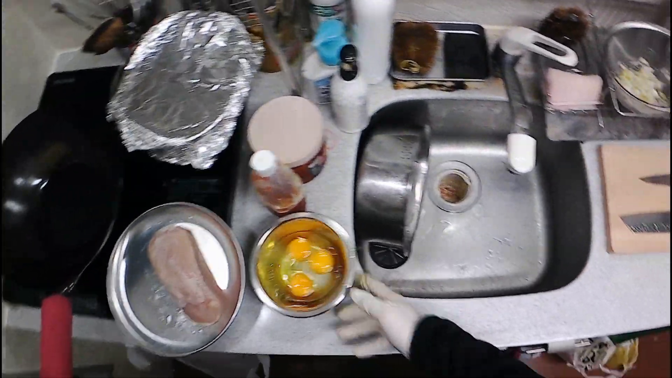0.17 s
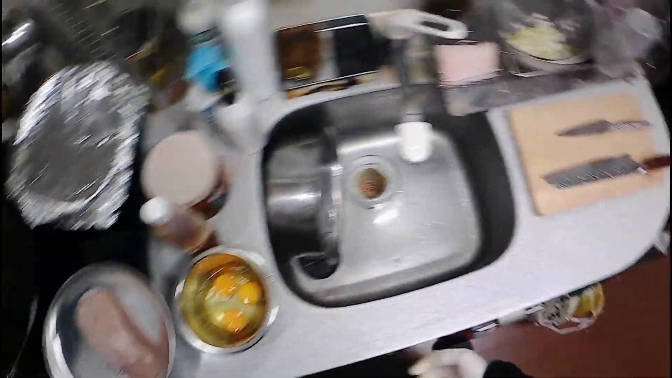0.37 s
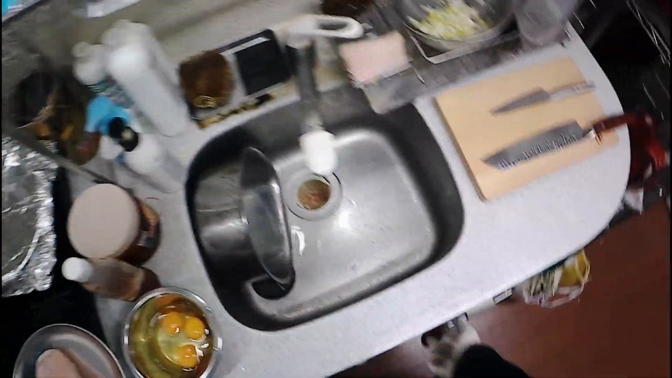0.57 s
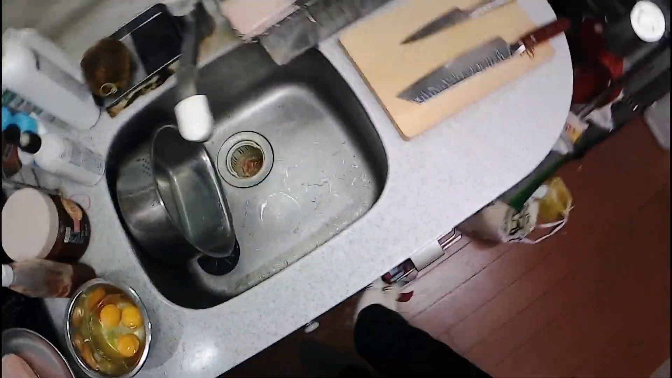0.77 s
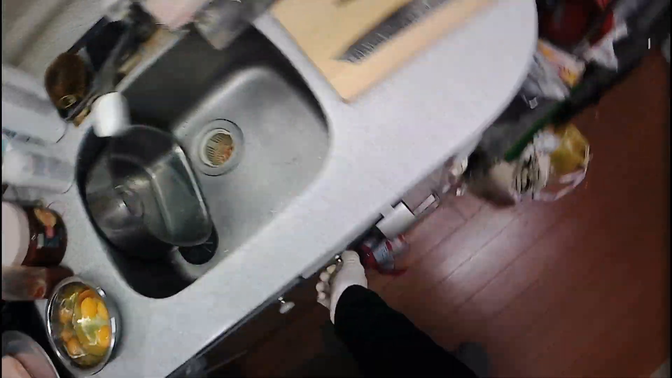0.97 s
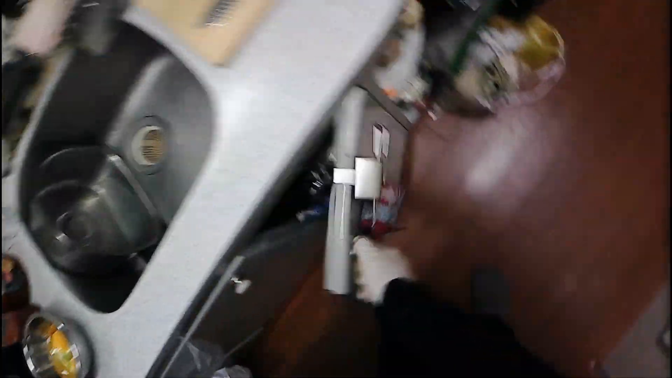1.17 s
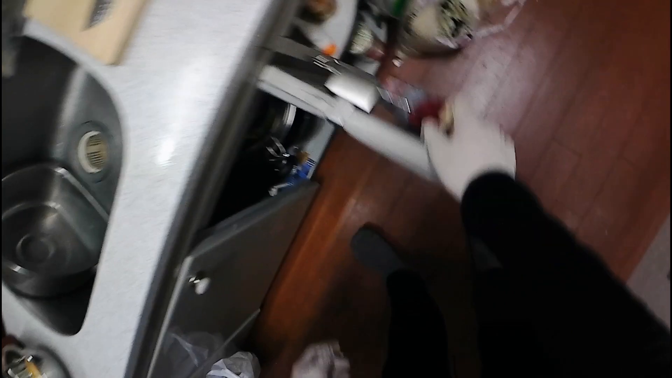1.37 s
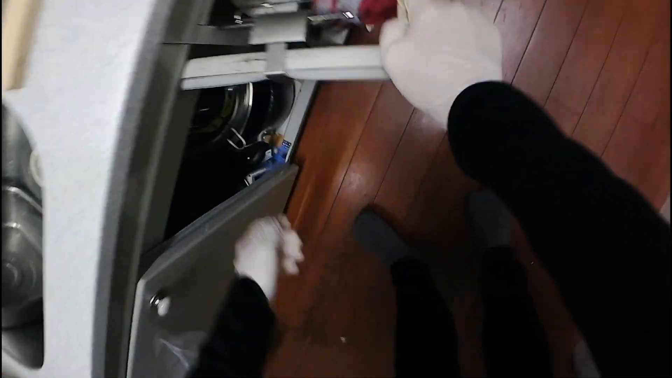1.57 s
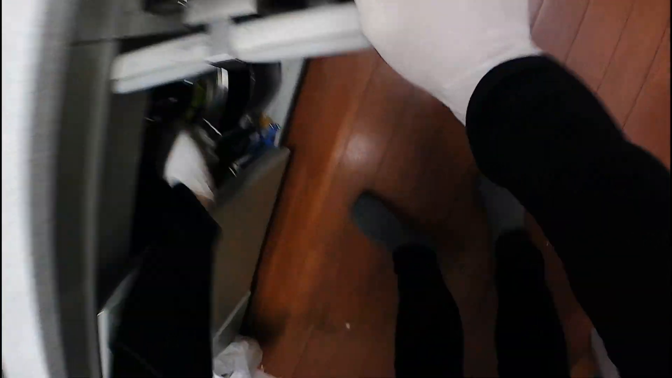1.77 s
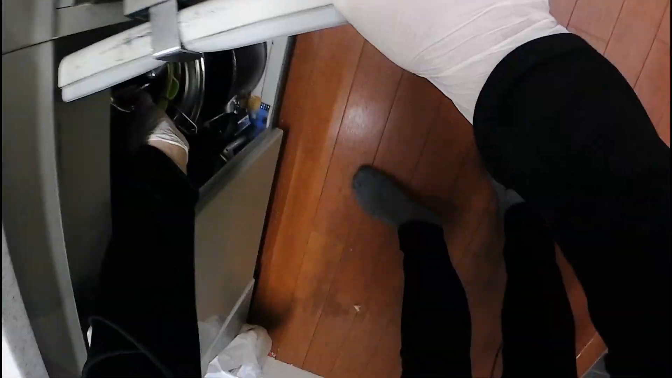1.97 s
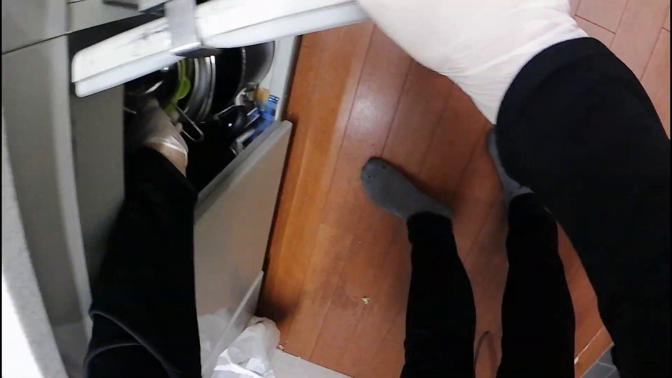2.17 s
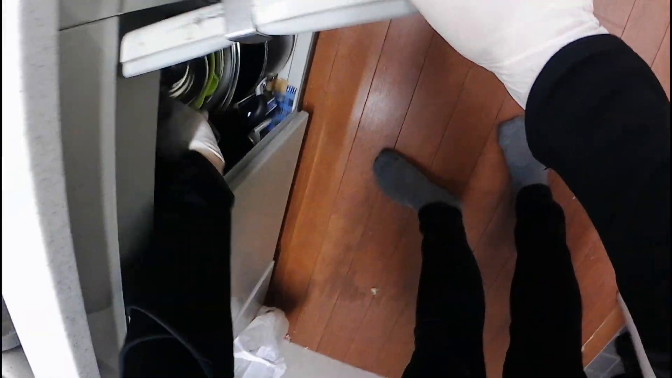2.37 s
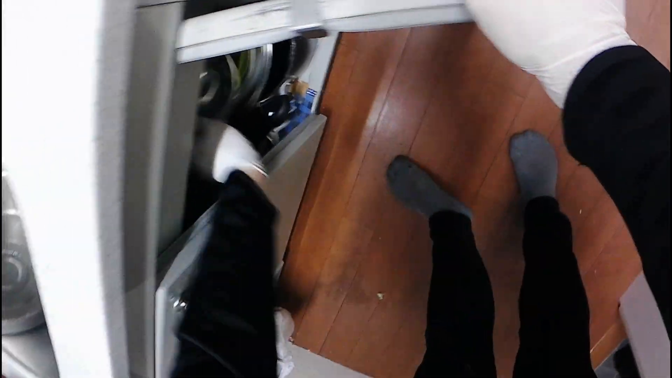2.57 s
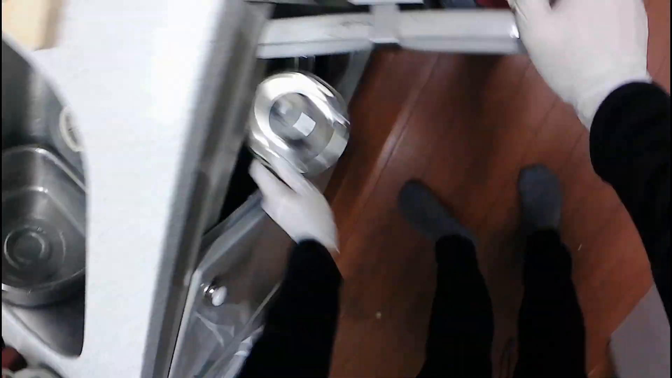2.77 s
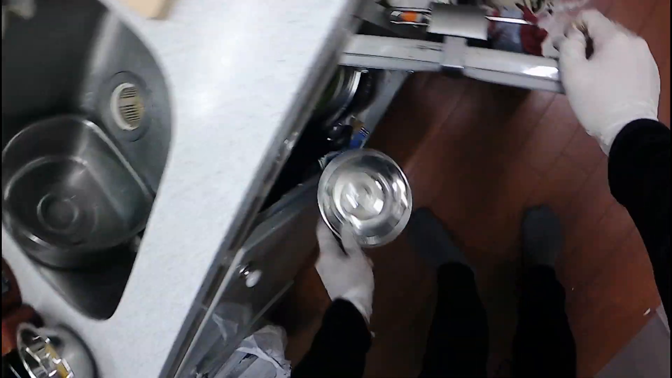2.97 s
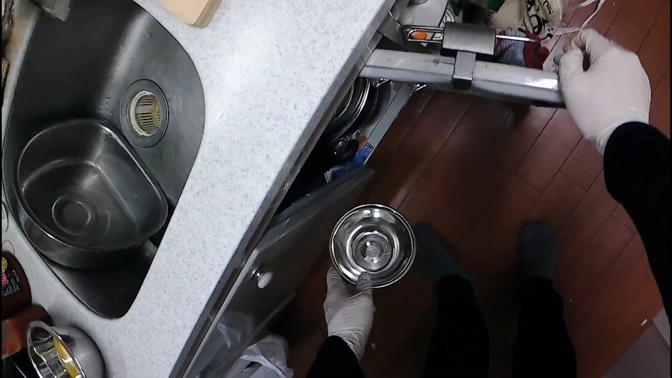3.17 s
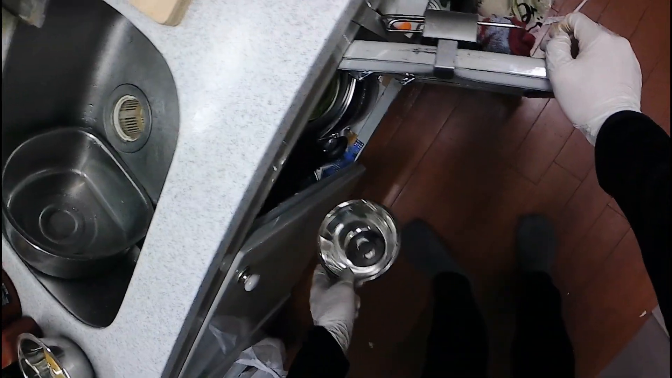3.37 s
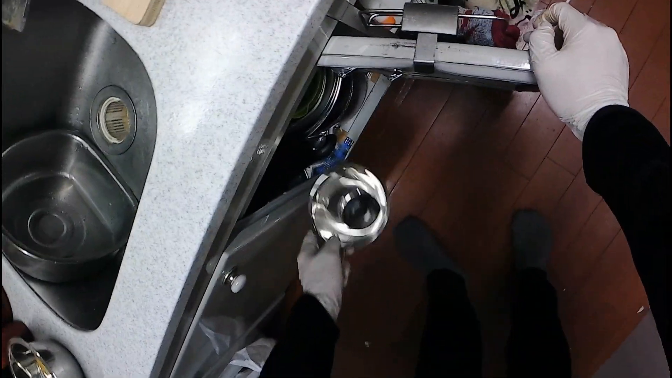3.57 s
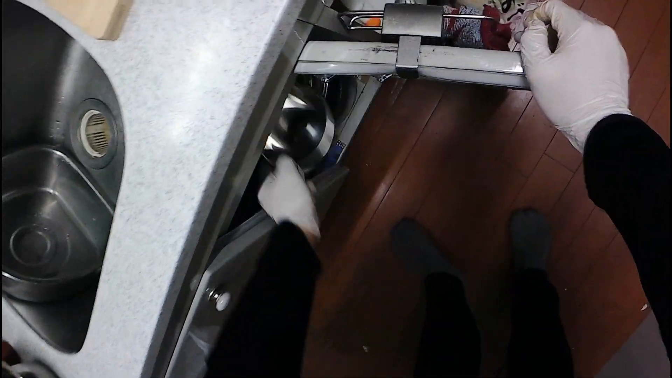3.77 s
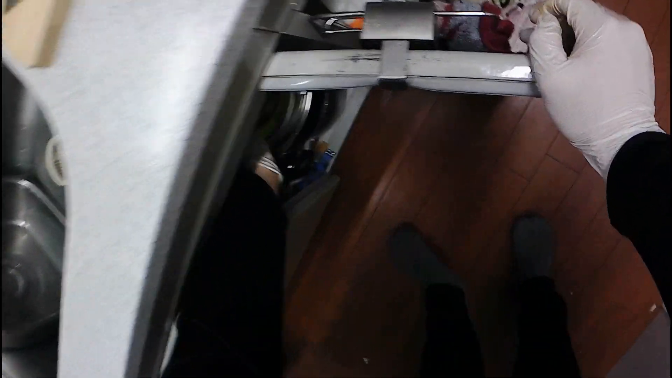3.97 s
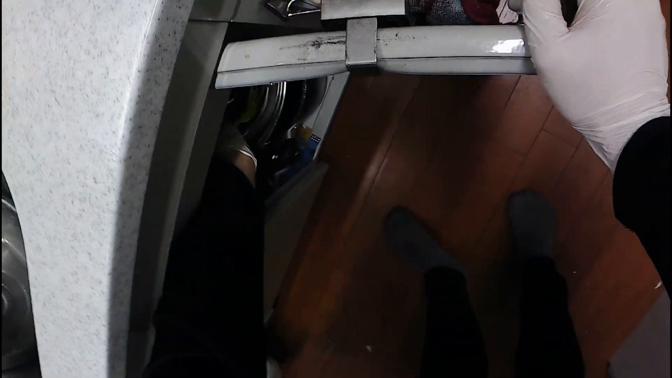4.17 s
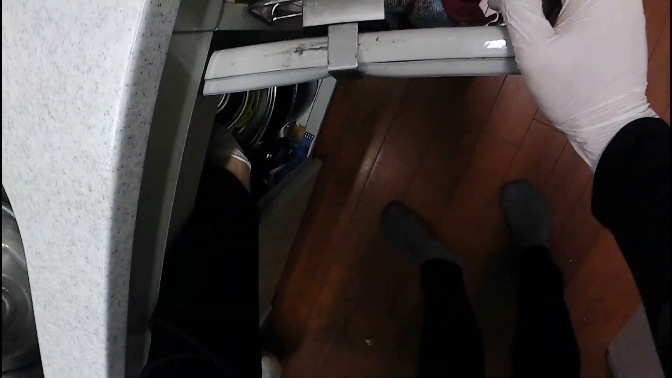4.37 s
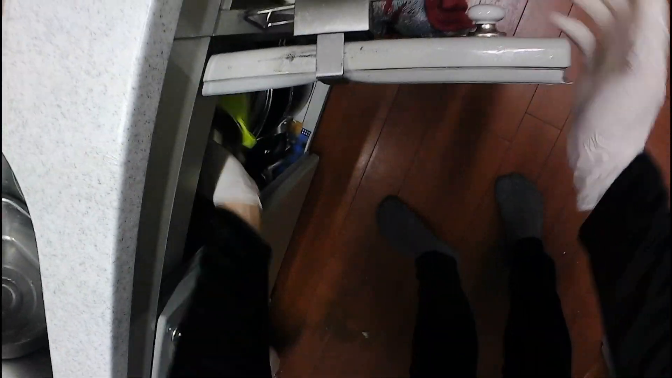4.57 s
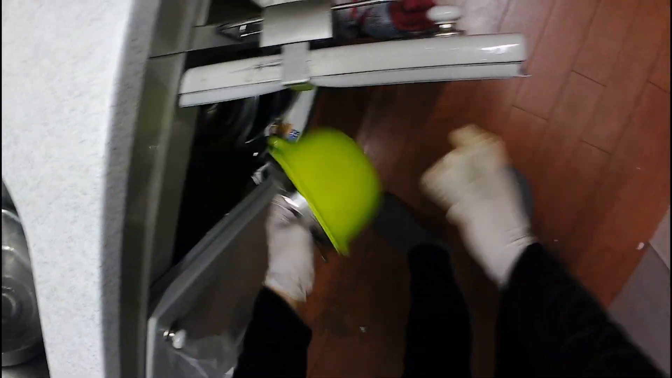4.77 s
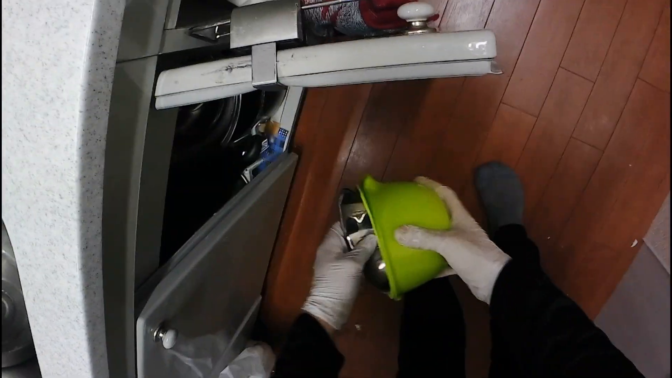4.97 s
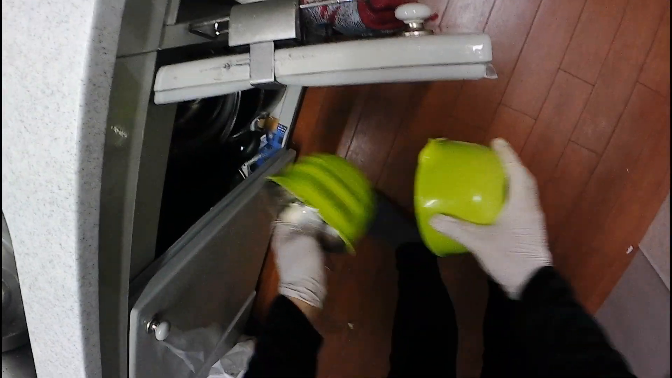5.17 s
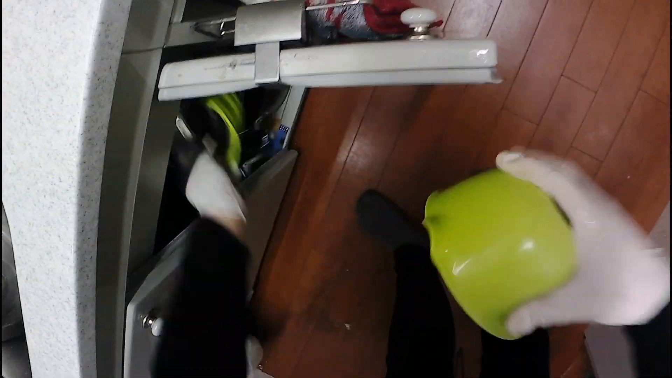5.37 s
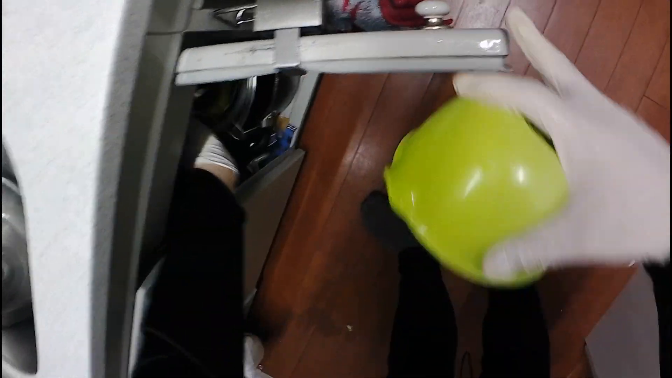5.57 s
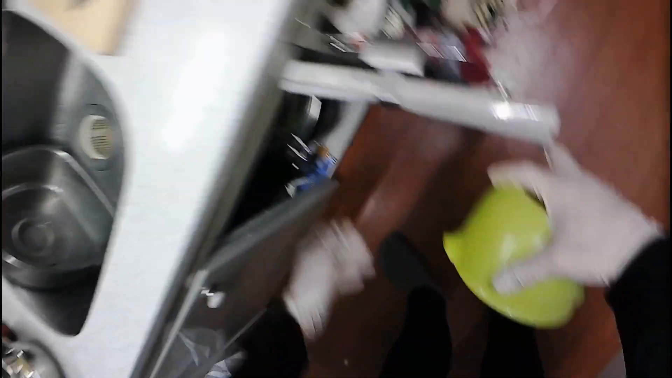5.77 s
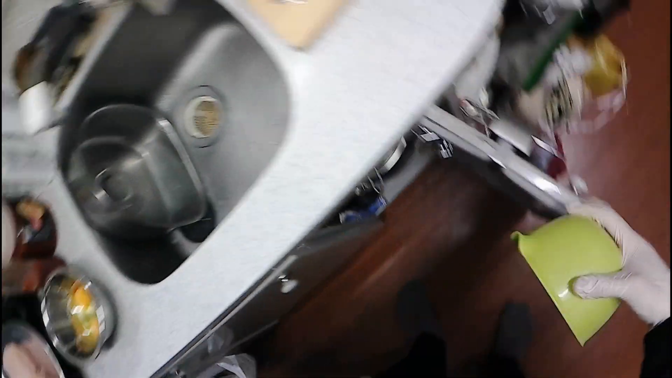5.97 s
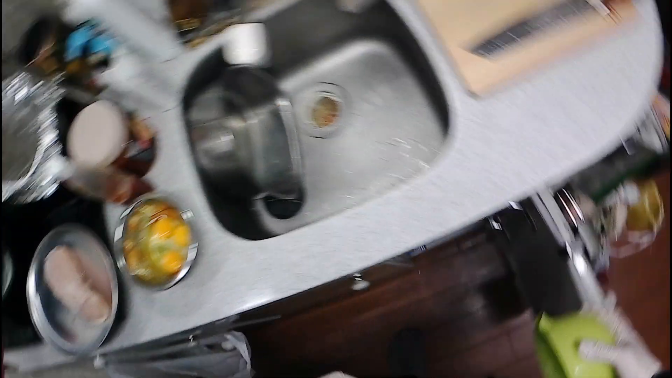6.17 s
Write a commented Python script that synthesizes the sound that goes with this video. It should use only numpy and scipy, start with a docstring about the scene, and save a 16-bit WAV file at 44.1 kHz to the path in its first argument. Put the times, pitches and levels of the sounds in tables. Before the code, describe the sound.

Someone rummages through bowls under a sink: cloth and door rustles, popping microphone bumps, then hollow knocks, a loud clack and scraping drop.

```python
"""In a cupboard under a kitchen sink, nested plastic and steel bowls are knocked, slid and dropped back.
Blows excite damped modes of each bowl; sliding and chattering drive modes with uneven friction noise.
Single rings sound alone, stick-slip makes squeaks, and grainy rubbing comes from door, sleeve and hands.
The microphone is worn on the head: its mount pops as the wearer moves, a faint tick of radio interference
repeats about ten times a second, and body rumble and hiss lie beneath."""
import sys
import numpy as np
from scipy import signal
from scipy.fft import rfft, irfft
from scipy.io import wavfile
from scipy.ndimage import uniform_filter1d

SR = 44100
rng = np.random.default_rng(int(sys.argv[2]) if len(sys.argv) > 2 else 0)


def pcm_store(signal):
    """Save signal as 16-bit PCM."""
    levels = np.round(np.clip(np.atleast_2d(signal), -1, 1) * 32767)
    wavfile.write(sys.argv[1], SR, levels.astype(np.int16).T)


N = 274302  # length in samples

# All t60 values are times to decay by 60 dB. Spectra are relative: the filtered sound is scaled to rms 1.

# Blows on the bowls. Each row: start in seconds, lowest ring in dB, lowest ring in Hz, wall in dB, rim in dB,
# clack in dB, steel in dB, damping as a factor on t60, hardness as rim brightness in dB per octave.
KNOCK_ROWS = [(2.038, -39, 592, -35, -47.5, -65, -54.5, 0.56, -6),
              (2.142, -33.5, 565, -38, -49, -53.5, -64, 0.99, 0),
              (2.369, -34, 575, -30, -44.5, -45, -77, 0.53, 1),
              (3.9232, -18, 640, -20, -31.5, -35, -61, 0.92, -9),
              (4.153, -39, 620, -26, -32.5, -44.5, -50, 0.57, -7),
              (4.312, -44, 705, -48, -52, -74, -78, 0.84, 0),
              (4.327, -41.5, 508.5, -60, -45, -63, -79, 0.99, -29),
              (4.506, -38, 480, -64, -37, -56, -39.5, 0.28, 9.5),
              (4.563, -48, 650, -59, -61, -64, -58, 0.51, 8),
              (4.764, -46, 487, -76, -75, -82, -82, 0.62, 3),
              (4.8545, -12, 572, -22, -29, -37.5, -34.5, 0.62, 6),
              (4.94, -33, 573, -62, -48, -55, -67, 0.71, -10),
              (4.974, -36, 586, -55, -46, -67, -70, 0.58, -11), (5.449, -36, 524, -34, -29, -42, -59, 1, 0),
              (5.552, -28.5, 490, -29, -25.5, -25.5, -23.5, 0.99, -2.5),
              (5.681, -38, 514, -58, -46, -45, -55, 0.72, 11),
              (6.0226, -61, 680, -66, -46.5, -61, -66, 0.74, 17)]
# Modes of the bowl walls. Each row: frequency in Hz, relative level in dB, t60 in seconds before damping.
WALL_MODES = [(757, -9.5, 0.087), (889, 0.5, .1), (916, -6, 0.25), (966, -3, 0.11)]
# Modes of the bowl rims. Each row: frequency in Hz, relative level in dB, t60 in seconds before damping.
RIM_MODES = [(1097, -2, 0.063), (1208, -13, 0.24), (1233, -1.5, 0.15), (1545, 0, 0.088), (1643, -2.5, 0.14),
             (1718, -1, 0.21), (1753, 1.5, 0.042), (2000, -10.5, 0.23), (2330, -9, 0.28),
             (2443, -11.5, 0.36), (2595, -9, 0.03), (2640, -11, 0.31)]
# Modes of the steel bowls. Each row: frequency in Hz, relative level in dB, t60 in seconds before damping.
STEEL_MODES = [(4135, 9, 0.13), (4266, 9, 0.23), (4650, 7, 0.25), (4320, 10, 0.094), (4270, -14, .2),
               (4930, 6, 0.28), (5300, -15, .1), (5900, 1, 0.079), (5800, 16, 0.091), (5900, -22, 0.12),
               (6240, -0.5, 0.078), (7300, -27, 0.11), (8300, -25, .08), (10000, -25, .1), (10800, -25, .1)]
# Lowest modes. Each row: multiple of the lowest ring, relative level in dB, t60 in seconds before damping.
LOW_MODES = [(1, 0, .11), (1.05, -12, .3), (1.18, -10, .21), (0.78, -14, .15)]
# Spectrum of the dull thud between the rings. Each row: frequency in Hz, density in dB per Hz.
BODY_SPECTRUM = [(88, -60), (150, -93), (241, -13), (460, -16), (568, -1), (1170, -16), (1700, -21),
                 (2120, -24.5), (3500, -28), (4550, -35.5), (7700, -120)]
# Spectrum of dry contact noise. Each row: frequency in Hz, density in dB per Hz.
GRIT_SPECTRUM = [(1760, -63), (3000, -10), (3810, 1), (4050, 0), (6130, 2.5), (9860, -3), (11000, 0),
                 (12900, -6.5), (16800, -42), (22000, -120)]
# Bowls sliding and rattling in the stack. Each row: start in seconds, rise in seconds, t60 in seconds,
# lowest ring in dB, lowest ring in Hz, wall in dB, rim in dB, grit in dB.
SLIDE_ROWS = [(1.755, 0.024, 0.28, -54.5, 604, -58, -63, -70),
              (1.83, 0.019, 1.3, -61.5, 600, -61.5, -69.5, -76),
              (2.06, 0.031, 0.87, -56.5, 650, -55.5, -63, -69),
              (2.2, 0.055, 2.7, -72, 600, -60, -69.5, -74), (2.4, 0.011, 0.22, -55, 630, -52, -63, -69),
              (2.46, .04, 1.1, -67, 562, -61, -71, -92), (3.96, 0.015, 0.51, -44, 670, -46, -63, -63),
              (4.09, 0.067, 0.14, -39.5, 607, -40, -49, -54.5),
              (4.17, 0.035, 0.51, -50, 560, -47.5, -53, -60), (4.3, 0.033, 1.04, -52, 510, -53.5, -65, -74),
              (4.41, 0.015, 2.1, -58, 566, -81, -63.5, -70),
              (4.51, 0.016, 0.18, -68, 520, -74, -56.5, -68.5),
              (4.54, 0.028, 0.22, -53, 523, -74, -75, -81), (4.843, 0.01, 0.046, -37, 574, -51, -48, -47),
              (4.885, 0.012, 0.19, -36.5, 625, -41.5, -46, -53),
              (4.93, 0.009, 0.58, -49.5, 603, -55, -64, -69),
              (5.445, 0.013, 1.06, -38.5, 533, -34.5, -38, -36),
              (5.47, 0.03, 0.32, -38, 536, -31.5, -37, -37.5),
              (5.53, 0.04, 0.49, -31, 552, -35, -33.5, -50), (5.68, 0.023, .7, -53, 555, -60, -51.5, -69)]
# Noise between the rim modes of a slide. Each row: frequency in Hz, density in dB per Hz.
RIM_SCRAPE = [(900, -8), (1100, 11.0), (3000, 0), (3600, -57)]
# Steel bowls chattering. Each row: start in seconds, t60 in seconds, level in dB.
CHATTER_ROWS = [(2.14, 0.27, -59), (4.149, 0.16, -49.5), (4.211, 0.13, -57), (5.55, .34, -28),
                (5.684, .35, -51)]
# A bowl holding one note as it skids or rings on after a blow. Each row: start in seconds, rise in seconds,
# hold in seconds, t60 in seconds, mean pitch in Hz, mean level in dB.
SINGLE_RING_ROWS = [(2.4, 0.014, .02, 1.1, 1140, -61.5), (2.47, 0.066, 0.045, 0.13, 898, -62),
                    (5.447, .006, .066, .03, 511, -29), (5.505, .012, .02, .2, 785, -35),
                    (5.56, .015, .03, .2, 1470, -41), (5.47, 0.01, 0.07, .22, 901, -32),
                    (3.945, .015, .05, 0.33, 675, -39)]
# Hinge and glove squeaks. Each row: start in seconds, rise in seconds, hold in seconds, starting pitch in Hz,
# sag in Hz per second, fundamental in dB, overtones in dB, rms wobble as a share of the pitch.
SQUEAK_ROWS = [(0.846, .05, .025, 1997, 500, -55, -28, 0.02),
               (1.371, .009, 0.014, 1905, 100, -51.5, -7.5, 0.117),
               (2.24, 0.0075, .012, 2060, 9000, -57.5, -6, .06),
               (4.806, 0.0051, 0.016, 2010, 1500, -55.5, -5, .11)]
# Door, sleeve and hands rubbing. Each row: start in seconds, rise in seconds, t60 in seconds,
# dull rub in dB, crackle in dB.
RUSTLE_ROWS = [(0.554, 0.011, 0.28, -52, -51), (.705, 0.0098, 0.85, -52.5, -53.5),
               (.86, 0.065, 0.33, -58.5, -66), (.93, .012, 0.19, -59, -57), (.96, 0.022, 0.37, -53, -56),
               (1.01, .025, 0.36, -44, -53), (1.121, .012, 0.37, -56, -60.5), (1.21, .011, 0.19, -59, -59),
               (1.249, .035, 0.45, -60, -60), (1.36, 0.012, .8, -54, -76), (1.6, 0.006, 0.57, -55, -56.5),
               (1.725, .008, .11, -57, -74), (1.868, 0.041, 0.26, -61, -77), (3.72, 0.029, 0.067, -62, -63),
               (3.799, 0.022, 0.069, -68, -62), (3.869, 0.048, .11, -67, -58.5),
               (5.361, 0.092, 0.089, -66, -55.5), (5.67, 0.021, 0.34, -38, -41.5),
               (5.79, 0.022, 0.24, -52, -48), (5.929, 0.023, 0.24, -56, -54.5),
               (6.01, 0.015, 0.18, -68, -48.5), (6.072, 0.019, 0.46, -56.5, -60)]
# Spectrum of the dull rub. Each row: frequency in Hz, density in dB per Hz.
RUB_SPECTRUM = [(90, -47), (200, -6), (330, 2.5), (600, -7), (1200, -62)]
# Spectrum of the crackle. Each row: frequency in Hz, density in dB per Hz.
CRACKLE_SPECTRUM = [(400, -9.5), (900, 1.5), (1500, -2.5), (2800, -14.5), (6000, -20.5), (9000, -53)]
# Decay of the kitchen's reverberation. Each row: frequency in Hz, t60 in seconds.
KITCHEN_DECAY = [(200, 0.36), (800, 0.1), (3000, 0.37), (10000, 0.088)]
# Slips of the mount. Each row: time of the peak in seconds, peak in dB before the low-pass, width in ms.
POP_ROWS = [(0.5187, -43, 0.49), (0.567, -42, 0.3), (0.648, -53, 0.97), (0.9094, -34, 0.5),
            (0.9321, -39, 0.82), (0.9866, -31, 0.32), (1.0243, -30.5, 0.58), (1.0402, -36, 0.7),
            (1.0656, -31.5, 0.38), (1.072, -43, 1.8), (1.1323, -34.5, 0.35), (1.2113, -38, 0.74),
            (1.29, -36, 1), (1.3026, -15.5, 0.26), (1.3101, -19, 0.3), (1.3135, -25.5, 0.38),
            (1.3514, -30.5, 1.3), (1.357, -25, 0.81), (1.4281, -28, 0.26), (1.4523, -39.5, 1.05),
            (1.471, -43, 1), (1.599, -37, 0.56), (1.7158, -42, 0.67), (1.7246, -45.5, 0.75),
            (2.7941, -38.5, 0.56), (2.804, -55, 0.7), (3.7515, -42.5, 0.6), (3.829, -48, 0.54),
            (4.7657, -44, 0.64), (5.2096, -42, 0.66), (5.2807, -43.5, 1), (5.2902, -44, 0.49),
            (5.3791, -43.5, 0.64), (5.9496, -29.5, 0.18), (5.9715, -33, 0.1), (6.0916, -23, 0.16),
            (6.0981, -22, 0.28), (6.1014, -32, 0.43)]
# Mean peak of the tick before the low-pass. Each row: time in seconds, peak in dB.
TICK_LEVEL = [(0, -45.5), (2.5, -48), (3.3, -49), (4, -50.5), (6.2, -42)]
# The body jolting the mount. Each row: start in seconds, amplitude in dB before decay and soft start,
# frequency in Hz, t60 in seconds.
JOLT_ROWS = [(1.358, -41, 61, 0.21), (1.734, -53, 85, 0.53), (3.75, -61, 84.4, 0.63),
             (5.687, -46.5, 126.5, 0.35), (6.09, -47, 54.3, 0.18)]
# Body movement carried to the microphone. Each row: time in seconds, level in dB.
RUMBLE_LEVEL = [(0.0, -70.5), (1.0, -64.5), (1.02, -63), (1.18, -69), (1.37, -49.5), (1.56, -69.5),
                (1.75, -64.5), (1.97, -73), (2.79, -68.5), (3.48, -74.5), (3.95, -61.5), (4.42, -69.5),
                (4.45, -62), (5.16, -70), (5.68, -57), (5.89, -67.5), (6.12, -62), (6.22, -67)]
# Spectrum of that rumble. Each row: frequency in Hz, density in dB per Hz.
RUMBLE_SPECTRUM = [(20, -2.5), (38, -38), (58, 0), (90, -3), (130, -5.5), (200, -15), (400, -42)]
# Spectrum of the microphone hiss. Each row: frequency in Hz, density in dB per Hz.
HISS_SPECTRUM = [(71, -32), (120, -3), (156, -2), (297, 0.5), (451, -6.5), (495, -7.5), (765, -7),
                 (1690, -13), (2080, -12), (2290, -16), (8930, -17), (10200, -19.5), (11000, -98),
                 (14300, -97), (22000, -120)]

STROKE_S = .4  # longest contact
LOW_RISE_S, CHATTER_RISE_S, SQUEAK_T60_S = .0016, 0.0066, 0.035
CLICK_DB, CLICK_PER_HARDNESS = -2.5, 1.56  # click against the rim; harder blows click louder
UNEVEN_DB = 3.  # rms jumps of sliding contacts
TICK_START_S, TICK_EVERY_S, TICK_MS = .0320, .102638, .6
HISS_DB, PATCHY_DB = -63, 1.2  # hiss level and its rms random variation
KITCHEN_DB, EDGE_HZ = -11.5, 12850


def gain_of(db):
    """Amplitude ratio corresponding to a level in decibels."""
    return 10 ** (np.asarray(db) / 20)


def evened(x):
    """Normalisation to unit rms."""
    return x / np.sqrt(np.mean(x ** 2) + 1e-20)


def read(points, hz):
    """Linear interpolation along a logarithmic frequency axis."""
    f, value = np.transpose(points)
    return np.interp(np.log(hz + 1), np.log(f + 1), value)


def add(mix, s, sound):
    """Superposition of a sound on the mix from time s."""
    part = mix[round(s * SR):][:len(sound)]
    part += sound[:len(part)]


def coloured(x, points):
    """Spectral shaping by multiplication in the frequency domain, then unit rms."""
    hz = np.fft.rfftfreq(len(x), 1 / SR)
    return evened(irfft(rfft(x) * gain_of(read(points, hz)), len(x)))


def wander(n, hold):
    """Random drift: a moving average of noise over hold samples, at unit rms."""
    return evened(uniform_filter1d(rng.standard_normal(n), hold))


def grains(n, uneven_db, hold):
    """Dry friction: noise whose strength wanders, averaged over hold samples."""
    strength = gain_of(uneven_db * wander(n, hold))
    return rng.standard_normal(n) * strength


def resonate(x, hz, t60):
    """Forced resonance: one damped mode as a single complex pole, at unit rms."""
    pole = np.exp((2j * np.pi * hz - np.log(1000) / t60) / SR)
    return evened(signal.lfilter([1], [1, -pole], x).real)


def rung(drive, modes, damping):
    """Modal superposition: the same contacts drive every mode, with alternating sign."""
    total = 0
    for k, (hz, db, t60) in enumerate(modes):
        total = total + (-1) ** k * gain_of(db) * resonate(drive, hz, damping * t60)
    return evened(total)


def stroke(rise, t60, hold=0):
    """Envelope of a contact: quadratic growth, a hold, then exponential decay."""
    t = np.arange(round(STROKE_S * SR)) / SR
    growth = np.minimum(t / rise, 1) ** 2
    decay = gain_of(-60 * np.maximum(t - rise - hold, 0) / t60)
    ending = np.clip((STROKE_S - t) / .08, 0, 1)
    return growth * decay * ending


def rings(t, modes, rise, damping):
    """Free vibration: damped sines, varied from blow to blow, the low ones starting nearly in step."""
    chance = rng.standard_normal((len(modes), 3))
    total = np.zeros(len(t))
    for (hz, db, t60), (louder, sharper, shift) in zip(modes, chance):
        decay = gain_of(db + 1.26 * louder - 60 * t / (t60 * damping))
        total += decay * np.sin(2 * np.pi * hz * (1 + 0.00895 * sharper) * t + shift * hz / 2000)
    size = np.sqrt(sum(gain_of(db) ** 2 for _, db, _ in modes))
    return total * (1 - np.exp(-t / rise)) / size


def knock(s, low_db, low_hz, wall_db, rim_db, clack_db, steel_db, damping, hardness):
    """Impact excitation: a blow sets modes ringing, with a dull thud, a click and a clack of noise."""
    t = np.arange(round(STROKE_S * SR)) / SR
    low_modes = [(low_hz * ratio, db, t60) for ratio, db, t60 in LOW_MODES]
    low = rings(t, low_modes, LOW_RISE_S, damping)

    thud = coloured(rng.standard_normal(len(t)), BODY_SPECTRUM)
    thud *= gain_of(-7.5 - 60 * t / (.12 * damping)) * (1 - np.exp(-t / 0.0019))

    # the clack dies in two stages, fast and slow
    clack = coloured(rng.standard_normal(len(t)), GRIT_SPECTRUM)
    clack *= gain_of(-7 - 60 * t / 0.025) + gain_of(-2.5 - 60 * t / (.2 * damping))
    clack *= 1 - np.exp(-t / 0.00098)

    click = np.sin(2 * np.pi * 2600 * t) * gain_of(-60 * t / 0.0014)
    click = signal.lfilter(*signal.butter(2, 500, "high", fs=SR), click)
    click_db = rim_db + CLICK_DB + CLICK_PER_HARDNESS * hardness

    rim_modes = [(hz, db + hardness * np.log2(hz / 1600), t60) for hz, db, t60 in RIM_MODES]
    sound = gain_of(click_db) * click + gain_of(low_db) * (low + thud) + gain_of(clack_db) * clack
    sound += gain_of(wall_db) * rings(t, WALL_MODES, 2 * LOW_RISE_S, damping)
    sound += gain_of(rim_db) * rings(t, rim_modes, 0.0027, damping)
    sound += gain_of(steel_db) * rings(t, STEEL_MODES, 0.0022, damping)
    return s, sound


def slide(s, rise, t60, low_db, low_hz, wall_db, rim_db, grit_db):
    """Friction excitation: dense tiny contacts sustain the bowl modes, with grit on top."""
    shape = stroke(rise, t60)
    drive = grains(len(shape), UNEVEN_DB, 90)
    low = evened(resonate(drive, low_hz, 0.062) + 1.57 * coloured(drive, BODY_SPECTRUM))
    wall = rung(drive, WALL_MODES, 0.73)
    rim = evened(rung(drive, RIM_MODES, 0.78) + .5 * coloured(drive, RIM_SCRAPE))
    grit = coloured(grains(len(shape), UNEVEN_DB, 90), GRIT_SPECTRUM)
    sound = gain_of(low_db) * low + gain_of(wall_db) * wall
    sound += gain_of(rim_db) * rim + gain_of(grit_db) * grit
    return s, sound * shape


def chatter(s, t60, db):
    """Repeated contact: quick uneven touches between steel rims drive heavily damped modes."""
    shape = stroke(CHATTER_RISE_S, t60)
    touches = grains(len(shape), 2.8, 150)
    return s, gain_of(db) * rung(touches, STEEL_MODES, 0.14) * shape


def single_ring(s, rise, hold, t60, hz, db):
    """Single-mode vibration: one ring of the bowl sounds alone, drifting slightly in pitch and level."""
    shape = stroke(rise, t60, hold)
    turns = np.cumsum(hz * (1 + 0.0025 * wander(len(shape), 200))) / SR
    level_db = db + 2.5 * wander(len(shape), 500)
    return s, np.sqrt(2) * gain_of(level_db) * np.sin(2 * np.pi * turns) * shape


def squeak(s, rise, hold, hz, sag_hz, db, over_db, wobble):
    """Stick-slip oscillation: uneven slips, slowing down, give a sagging tone with overtones."""
    shape = stroke(rise, SQUEAK_T60_S, hold)
    pitch = np.maximum(hz - sag_hz * np.arange(len(shape)) / SR, 1000)
    turns = np.cumsum(pitch * (1 + wobble * wander(len(shape), 40))) / SR
    overtones = sum(np.sin(2 * np.pi * k * turns) / (k - 1) for k in range(2, 5))
    tone = np.sin(2 * np.pi * turns) + gain_of(over_db) * overtones
    return s, np.sqrt(2) * gain_of(db) * tone * shape


def rustle(s, rise, t60, rub_db, crackle_db):
    """Rough-surface friction: grainy rubbing in a dull and a crackly band."""
    shape = stroke(rise, t60)
    rub = coloured(grains(len(shape), 5.4, 120), RUB_SPECTRUM)
    crackle = coloured(grains(len(shape), 4.5, 40), CRACKLE_SPECTRUM)
    return s, (gain_of(rub_db) * rub + gain_of(crackle_db) * crackle) * shape


def kitchen(x):
    """Reverberation: sparse reflections of random sign, each band decaying at its own rate."""
    taps = np.zeros(SR // 2)
    at = np.arange(200, len(taps) - 20, 20)
    taps[at + rng.integers(0, 20, len(at))] = rng.choice([-1., 1.], len(at))
    hz, t, z = signal.stft(taps, SR, nperseg=256)
    decay = gain_of(-60 * t / read(KITCHEN_DECAY, hz)[:, None])
    tail = signal.istft(z * decay, SR, nperseg=256)[1]
    return signal.fftconvolve(x, tail / np.linalg.norm(tail))[:N]


def pops_and_ticks():
    """Pressure equalisation: each slip is a push on the capsule, whose vent swings the pressure below zero.

    A regular tick of radio interference is given the same pulse shape."""
    out, t_ms = np.zeros(N), np.arange(-150, 350) / SR * 1000
    at = np.arange(TICK_START_S, N / SR, TICK_EVERY_S)
    tick_db = np.interp(at, *np.transpose(TICK_LEVEL)) + 0.49 * rng.standard_normal(len(at))
    ticks = [(s, db, TICK_MS) for s, db in zip(at, tick_db)]
    vent = signal.butter(2, 200, "high", fs=SR)
    for s, db, ms in list(POP_ROWS) + ticks:
        # short pulses snap up and ease off; long ones build up more slowly, then also ease off
        build = np.clip(1.1 * ms, .25, .6)
        before = np.exp(-(t_ms / (1.1 * ms * build)) ** 2)
        after = np.exp(-abs(t_ms / (1.48 * ms * (1 - build))) ** 0.65)
        swing = signal.lfilter(*vent, np.where(t_ms < 0, before, after))
        add(out, s - swing.argmax() / SR, gain_of(db) * swing / swing.max())
    return signal.lfilter(*signal.butter(2, 6500, fs=SR), out)  # a low-pass rounds off the pops and ticks


def jolts():
    """Damped oscillation: low swings of the mount with a soft start."""
    out, t = np.zeros(N), np.arange(SR // 2) / SR
    for s, db, hz, t60 in JOLT_ROWS:
        swing = gain_of(db - 60 * t / t60) * np.sin(2 * np.pi * hz * t)
        add(out, s, swing * (1 - np.exp(-t / 0.0075)))
    return out


def background():
    """Modulated noise: microphone hiss with random level variation over time and frequency, and body rumble."""
    hz, t, z = signal.stft(coloured(rng.standard_normal(N), HISS_SPECTRUM), SR, nperseg=512)
    patches = uniform_filter1d(rng.standard_normal(z.shape), 6, axis=0)  # across frequency
    patches = evened(uniform_filter1d(patches, 8, axis=1))  # across time
    hiss = evened(signal.istft(z * gain_of(PATCHY_DB * patches), SR, nperseg=512)[1][:N])
    rumble_db = np.interp(np.arange(N) / SR, *np.transpose(RUMBLE_LEVEL))
    rumble = coloured(grains(N, 4.1, 3000), RUMBLE_SPECTRUM)
    return gain_of(HISS_DB) * hiss + gain_of(rumble_db) * rumble


def scene():
    """Superposition: bowls and door with their reverberation, then pops, ticks, jolts and noise."""
    near = np.zeros(N)
    sources = ((knock, KNOCK_ROWS), (slide, SLIDE_ROWS), (chatter, CHATTER_ROWS),
               (single_ring, SINGLE_RING_ROWS), (squeak, SQUEAK_ROWS), (rustle, RUSTLE_ROWS))
    for play, rows in sources:
        for row in rows:
            add(near, *play(*row))
    wet = gain_of(KITCHEN_DB) * kitchen(near)
    return (near + wet + pops_and_ticks() + jolts() + background())[None]


def record(dry):
    """Band limitation: a linear-phase low-pass removes the top of the spectrum."""
    low_pass = signal.firwin(511, EDGE_HZ, window=("kaiser", 9), fs=SR)
    return signal.oaconvolve(dry, low_pass[None], "same")


dry = scene()
out = record(dry)
pcm_store(out)
```